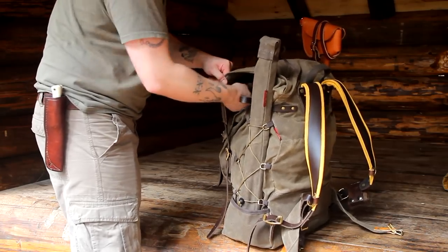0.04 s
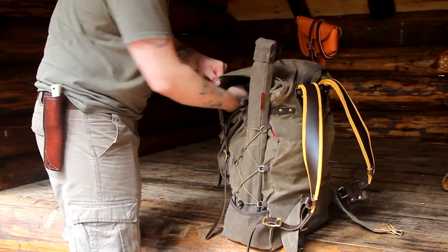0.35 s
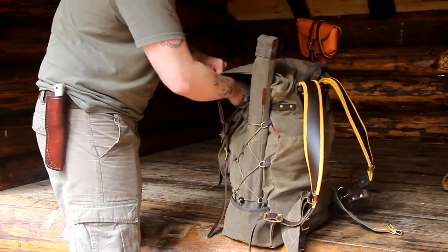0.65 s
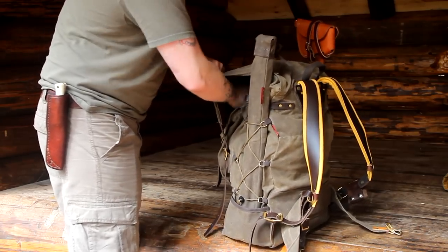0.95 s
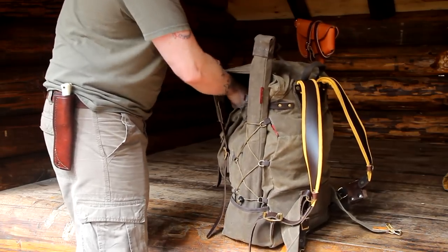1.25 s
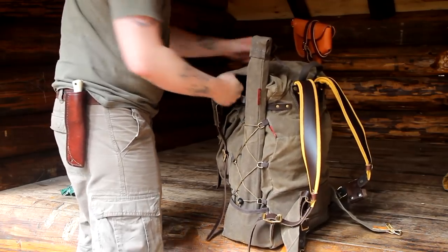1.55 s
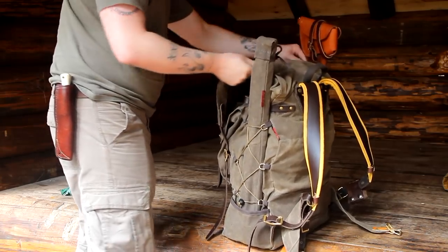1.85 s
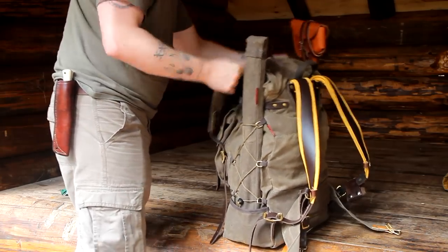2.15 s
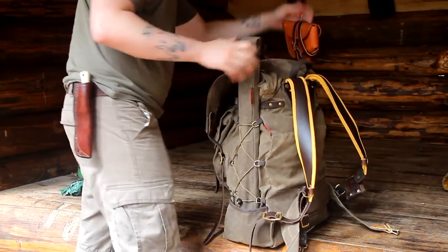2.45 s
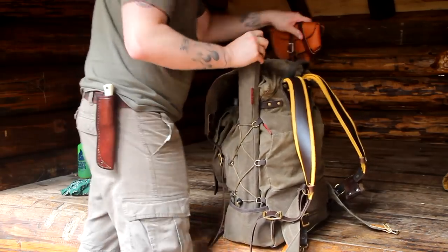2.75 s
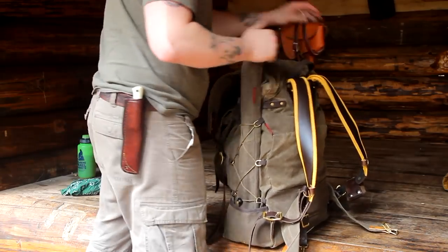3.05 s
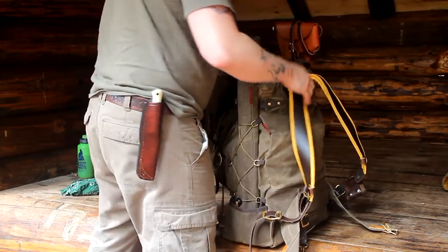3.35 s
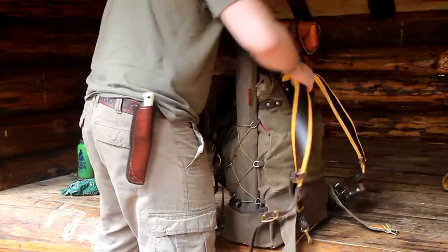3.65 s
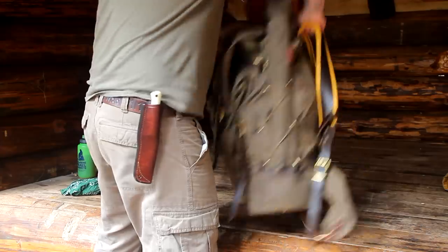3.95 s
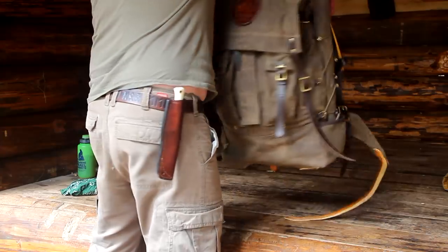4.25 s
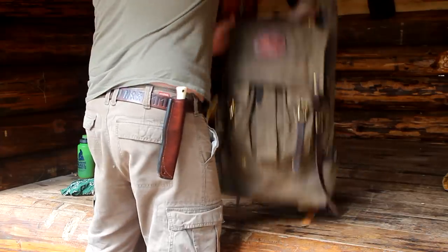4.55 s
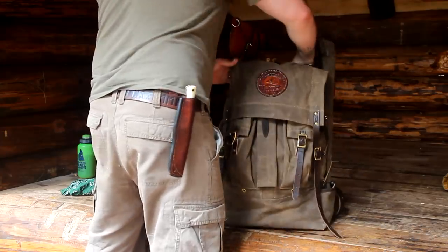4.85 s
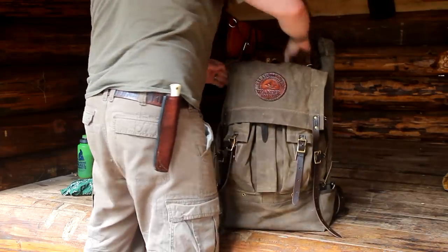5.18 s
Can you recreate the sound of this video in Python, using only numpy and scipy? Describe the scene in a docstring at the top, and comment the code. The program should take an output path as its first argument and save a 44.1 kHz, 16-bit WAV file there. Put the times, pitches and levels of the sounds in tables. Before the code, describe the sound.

In a quiet log shelter, a canvas backpack is fastened close to the microphone: cloth rubs, straps tug and a fastener snaps sharply. The pack is lifted with a scrape and thin clinks of buckles. Near the end it drops onto wooden boards with a double knock and a heavy thump that briefly overloads the microphone, then settles with a strap slap. A faint outdoor hush and low plank rumble lie underneath.

```python
"""A canvas pack drops on the plank floor of a log shelter: its frame strikes twice, then the load
thumps down, rings the boards and overloads the microphone. Before that it is strapped shut and lifted:
cloth rubs in tiny slips, leather straps tug and slap, a fastener snaps and metal buckles jingle.
Underneath are an outdoor hush and the rumble of flexing planks; the logs return short echoes."""
import sys
import numpy as np
from scipy import signal
from scipy.io import wavfile

SR = 44100
rng = np.random.default_rng(int(sys.argv[2]) if len(sys.argv) > 2 else 0)


def master(y):
    """Save y as 16-bit WAV."""
    cut = np.clip(np.atleast_2d(y).T, -1, 1)
    pcm = np.round(cut * 32767)  # scale
    wavfile.write(sys.argv[1], SR, pcm.astype(np.int16))


N = 230052
TIME_S = np.arange(N) / SR
AFTER_S = TIME_S[:SR]  # the second after a blow


def amp(db):
    """Decibels to gain."""
    return 10 ** (np.asarray(db) / 20)


def unit_rms(x):
    """Scales to rms 1."""
    return x / np.sqrt(np.mean(x ** 2) + 1e-20)


def unit_blow(x):
    """Scales to the energy of 1 ms at full level."""
    return x / np.sqrt(np.sum(x ** 2) * 1000 / SR + 1e-20)


def lookup(points, hz):
    """Interpolates a table over log frequency."""
    points_hz, values = np.transpose(points)
    return np.interp(np.log(hz + 1), np.log(points_hz + 1), values)


def add(mix, start_s, sound):
    """Mixes a sound in at start_s."""
    part = mix[max(round(start_s * SR), 0):][:len(sound)]
    part += sound[:len(part)]


def decay(t60_s):
    """Envelope falling 60 dB in t60_s."""
    return np.exp(-np.log(1000) * AFTER_S / t60_s)


def coloured(x, colour, size=4096):
    """Minimum-phase filter from rows of freq_hz, gain_db."""
    log_gain = np.log(amp(lookup(colour, abs(np.fft.fftfreq(size, 1 / SR)))))
    taps = np.fft.ifft(np.exp(np.conj(signal.hilbert(log_gain)))).real
    return signal.oaconvolve(x, taps)[:len(x)]


def band(x, low_hz, high_hz, order=2):
    """Butterworth band-pass."""
    sos = signal.butter(order, [low_hz, min(high_hz, SR / 2 - 100)], "band", fs=SR, output="sos")
    return signal.sosfilt(sos, x)


def ring(modes):
    """Free ringing of a struck object: damped sines."""
    return sum(amp(db) * decay(t60_s) * np.sin(2 * np.pi * hz * AFTER_S) for hz, db, t60_s in modes)


def contact(crunch_t60_s, crunch, touch_t60_s=0.0036):
    """A brief rough touch, then a crunch of small slips."""
    touch, slips = rng.standard_normal((2, SR))
    return unit_blow(touch * decay(touch_t60_s)) + crunch * unit_blow(slips * decay(crunch_t60_s))


def hard_blows(rows, colour, modes, crunch):
    """Hard contacts: a crack plus the ring of the struck object."""
    out = np.zeros(N)
    tone = unit_blow(ring(modes) * (1 - decay(0.0032)))
    for start_s, db, ring_db, crack_t60_s in rows:
        crack = unit_blow(coloured(contact(crack_t60_s, crunch), colour))
        add(out, start_s, amp(db) * (crack + amp(ring_db) * tone))
    return out


def soft_blows(rows):
    """Soft contacts: a few swings that swell and die."""
    out = np.zeros(N)
    for start_s, db, hz, half_rise_s in rows:
        age = AFTER_S / (2 * half_rise_s)
        swell = (age * np.exp(1 - age)) ** 3
        add(out, start_s, -amp(db) * swell * np.sin(2 * np.pi * hz * AFTER_S))
    return out


def friction(colour, slips_per_s, spread_db, hiss, flutter_db):
    """Fibres catch and slip: uneven clicks over hiss, clumped by the unsteady hand."""
    sizes = np.minimum(rng.exponential(1, N), 3)
    slips = (rng.random(N) < slips_per_s / SR) * rng.choice([-1, 1], N) * amp(spread_db * sizes)
    clumps = unit_rms(band(rng.standard_normal(N), 3.2, 74, order=1))
    rubbing = unit_rms(slips) + hiss * rng.standard_normal(N)
    return unit_rms(coloured(rubbing * amp(flutter_db * clumps), colour))


def stroke(middle_s, half_s, shape=1.3):
    """A hand speeds up and slows down; a shape below 2 is more pointed than a bell."""
    return np.exp(-np.minimum(abs((TIME_S - middle_s) / half_s) ** shape, 20))


def shelter(x, tail_db, echo_db, scatter_t60_s=0.025):
    """Round logs scatter each early echo; a diffuse tail follows, longest in the low mids."""
    # floor, roof and wall echoes: delay_s, relative_db
    echoes = [(.0031, -3.5), (0.011, -5.5), (0.0164, -9.5), (0.0194, -24.5), (0.0274, -16), (0.036, -28)]
    # tail decay: freq_hz, t60_s
    tail_t60 = [(60, 0.078), (200, 0.29), (600, 0.27), (2000, 0.19), (5000, 0.17), (14000, 0.15)]
    hz, time_s, spectrum = signal.stft(rng.standard_normal(SR), SR, nperseg=256)
    fade = np.exp(-np.log(1000) * time_s / lookup(tail_t60, hz)[:, None])
    tail = signal.istft(spectrum * fade, SR, nperseg=256)[1][:SR]
    tail *= np.clip((AFTER_S - 0.004) / 0.01, 0, 1)
    response = amp(tail_db) * tail / np.linalg.norm(tail)
    for delay_s, db in echoes:
        echo = rng.standard_normal(SR) * decay(scatter_t60_s)
        add(response, delay_s, amp(db + echo_db) * echo / np.linalg.norm(echo))
    return x + signal.oaconvolve(x, response)[:N]


def air(level_db=-51):
    """Steady outdoor hush."""
    # hush spectrum: freq_hz, gain_db
    colour = [(12, -38), (20, -3), (30, -33), (49, -11), (101, -6.5), (326, -2.5), (775, -4.5),
              (14500, -22.5), (15800, -26)]
    return amp(level_db) * unit_rms(coloured(rng.standard_normal(N), colour))


def plank_flex(idle_db=-68, rise_s=0.033):
    """The planks rumble faintly, swelling when weight comes down."""
    # weight of the feet, lastly of the pack: start_s, level_db, fall_tau_s
    loadings = [(0.37, -50, 0.5), (0.8, -48, 0.25), (2.18, -48, 0.24), (2.62, -36.5, 0.17),
                (4.68, -35, 0.6)]
    # rumble spectrum: freq_hz, gain_db
    colour = [(12, 25.5), (28, 2), (50, 3), (95, 11), (140, 5), (300, -99)]
    level = amp(idle_db)
    for start_s, db, fall_tau_s in loadings:
        since_s = np.maximum(TIME_S - start_s, 0)
        level += amp(db) * (1 - np.exp(-since_s / rise_s)) * np.exp(-since_s / fall_tau_s)
    return level * unit_rms(coloured(rng.standard_normal(N), colour))


def rustle(gain_db=-2, load_lag_s=0.017, drag_db=-5):
    """Heaves scrape the straps, then crumple the load; brushes swish the canvas and drag the straps."""
    # pack pushed, pulled or settling: middle_s, half_length_s, scrape_db, load_re_scrape_db
    heaves = [(0.007, 0.081, -47.5, 12.5), (0.42, 0.075, -47.5, 6), (0.765, 0.064, -50.5, 5.5),
              (1.001, 0.18, -57, 8.5), (1.424, 0.18, -50.5, -14), (1.94, 0.31, -49.5, -0.5),
              (2.2, 0.066, -42.5, 0), (2.658, 0.039, -35.5, -1), (2.877, 0.37, -48, 0.5),
              (3.58, 0.11, -43, 1.5), (3.883, 0.12, -39.5, 1.5), (4.213, 0.37, -54.5, -5),
              (4.763, 0.049, -40, 21.5), (4.874, 0.021, -30.5, -7), (5.046, 0.13, -60, 19)]
    # hand or sleeve on canvas: middle_s, half_length_s, level_db
    brushes = [(0.032, 0.11, -47.5), (0.397, 0.049, -43.5), (0.575, 0.048, -47.5), (0.774, 0.028, -40.5),
               (0.916, 0.063, -45.5), (1.393, 0.068, -45), (1.648, 0.046, -52), (1.898, 0.25, -60),
               (2.187, 0.038, -44), (2.336, 0.029, -48), (3.064, 0.041, -52), (3.528, 0.049, -48),
               (3.853, 0.3, -59), (4.173, 0.064, -51), (4.876, 0.029, -54), (5.21, 0.054, -53)]
    # load, strap and canvas spectra: freq_hz, gain_db
    load_colour = [(30, -20), (70, -18), (120, -1.5), (200, -2.5), (330, 1), (600, -6), (1000, -12.5),
                   (2000, -22.5), (5000, -55)]
    strap_colour = [(200, -7.5), (500, -3.5), (900, 3.5), (1600, 1), (2800, -2), (4500, -10), (9000, -26.5)]
    canvas_colour = [(500, 1), (2000, -6), (4000, 0.5), (6500, -3.5), (10000, -6), (15500, -7.5)]
    swish = sum(amp(db) * stroke(s, half_s) for s, half_s, db in brushes)
    crumple = sum(amp(db + load_db) * stroke(s + load_lag_s, half_s) for s, half_s, db, load_db in heaves)
    pull_power = sum((amp(db) * stroke(s, half_s)) ** 2 for s, half_s, db, _ in heaves)
    scrape = np.sqrt(pull_power + (amp(drag_db) * swish) ** 2)
    folds = friction(load_colour, slips_per_s=250, spread_db=3, hiss=0.7, flutter_db=3)
    leather = friction(strap_colour, slips_per_s=900, spread_db=3, hiss=1.2, flutter_db=1.3)
    weave = friction(canvas_colour, slips_per_s=3000, spread_db=2, hiss=1, flutter_db=1)
    return amp(gain_db) * (crumple * folds + scrape * leather + swish * weave)


def strap_slides():
    """A strap zips through the hand in fine, dense slips."""
    # slides: middle_s, level_db, centre_hz, half_length_s
    slides = [(2.192, -52, 3630, 0.025), (3.542, -39.5, 2480, 0.0095), (3.549, -37, 1130, 0.025),
              (3.957, -42, 1970, 0.0088)]
    slips = friction([(300, 0), (15000, 0)], slips_per_s=1500, spread_db=2, hiss=0.7, flutter_db=2)
    out = np.zeros(N)
    for middle_s, db, hz, half_s in slides:
        swell = np.exp(-((TIME_S - middle_s) / half_s) ** 2)
        out += amp(db) * swell * unit_rms(band(slips, hz / 1.18, hz * 1.28))
    return out


def tug(body_hz, tick_db, length_s, pack_db=-6, pack_hz=280, boards_db=-12):
    """A strap pulled taut knocks dully, ticks at its surface and shakes the pack and boards."""
    take_up_s = 0.0011 * (length_s / 0.022) ** 1.5  # slack leather takes the load gradually
    push = contact(length_s * 2, crunch=1.1) * (1 - np.exp(-(AFTER_S + 0.00034) / take_up_s))
    strap = unit_blow(band(push, body_hz / 1.75, body_hz * 1.695, order=3))
    shake = contact(length_s * 3, crunch=1.5)
    pack = unit_blow(band(shake, pack_hz / 1.92, pack_hz * 1.65))
    boards = amp(boards_db) * unit_blow(band(shake, 66, 134))
    coupling = min(1, (400 / body_hz) ** 2)  # light, high slaps hardly move the pack
    tick_colour = [(400, -53), (1000, 15.5), (2200, 13.5), (3200, 9), (4000, 9.5), (5000, 3), (15000, -7)]
    tick = unit_blow(coloured(push, tick_colour))
    return strap + amp(tick_db) * tick + amp(pack_db) * coupling * (pack + boards)


def strap_tugs(rebound_s=0.015, rebound_db=-5):
    """After each tug the strap gives and catches again: weaker, duller, longer."""
    # leather tugs and slaps: start_s, level_db, body_hz, tick_re_body_db, nominal_length_s
    pulls = [(0.006, -20.5, 332, -30, 0.034), (0.056, -25.5, 320, -32, 0.023), (0.399, -25, 400, -15, 0.03),
             (0.451, -21, 374, -13.5, 0.013), (0.464, -28, 420, -30, .028), (0.5785, -19, 460, -27, 0.019),
             (0.696, -27, 380, -11, 0.026), (0.71, -23.5, 400, -7.5, 0.016),
             (0.834, -21.5, 321, -14, 0.027), (0.958, -22.5, 367, -11.5, 0.025),
             (0.999, -14.5, 387, -11.5, 0.02), (1.214, -31.5, 953, -1, 0.054), (1.857, -25, 920, -6, 0.041),
             (2.11, -29, 404, -6, .017), (2.968, -29.5, 590, -16, 0.0086), (3.453, -33, 810, -11, 0.015),
             (3.466, -25, 337, -6.5, 0.029), (3.607, -32.5, 690, 0, 0.01), (3.765, -24.5, 283, -14, .07),
             (3.956, -20.5, 485, -16, 0.041), (4.276, -30.5, 610, -0.5, .024),
             (4.988, -13, 570, -17.5, 0.032), (5.1, -28, 513, -35, .019)]
    out = np.zeros(N)
    for start_s, db, body_hz, tick_db, length_s in pulls:
        add(out, start_s, amp(db) * tug(body_hz, tick_db, length_s))
        add(out, start_s + rebound_s, amp(db + rebound_db) * tug(body_hz, tick_db - 9, length_s * 1.4))
    return out


def fitting_ticks():
    """The fittings click without ringing."""
    # clicks: start_s, level_db, pitch_hz
    ticks = [(0.535, -37.5, 2500), (0.998, -32, 4100), (1.224, -40, 9000), (1.879, -40, 5000),
             (2.664, -31.5, 6000), (3.325, -40, 9500), (3.611, -36.5, 7000), (3.907, -29, 5800),
             (4.35, -38.5, 9000)]
    out = np.zeros(N)
    for start_s, db, hz in ticks:
        click = band(contact(0.036, crunch=2.2), hz / 2.6, hz * 1.13, order=1)
        add(out, start_s, amp(db) * unit_blow(click))
    return out


def buckles(spread_db=3, chatter=0.65, tick_db=-9.5, bounce_s=0.0047, bounce_db=-5.5, free_t60_s=0.26):
    """Buckles tick, ring one main mode and others by chance, and bounce once; loose metal chatters."""
    # touches: start_s, level_db, main_hz, main_t60_s, others_re_main_db
    clinks = [(3.712, -32.5, 7600, .1, 4), (3.819, -36, 15391, .35, 0), (3.844, -32, 14648, 0.13, 4),
              (3.869, -27, 14648, 0.16, -9), (3.879, -33, 7337, 0.3, -3), (3.925, -30.5, 5512, 0.3, 7),
              (4.069, -39.5, 11200, 0.14, 1), (4.154, -32.5, 11430, .12, -8), (4.616, -16, 15391, .11, 12),
              (4.692, -29, 12170, 0.4, -2), (4.86, -32, 14648, 0.12, 10), (4.996, -40.5, 9550, 0.075, -10),
              (4.999, -43, 8050, 0.23, -5)]
    # free-hanging buckle: pitch_hz, relative_db, t60_s
    modes = [(3300, -16, .15), (5512, -10, .2), (7337, -5, .25), (7620, -8, .18), (8050, -15, .25),
             (9550, -12, .16), (10847, -9, .25), (11100, -6, .22), (11625, -8, .18), (12180, -5, .25),
             (13800, -9, .18), (14648, -3, .18), (15391, 0, .25), (15730, -6, .2)]
    modes_hz, modes_db, modes_t60_s = np.transpose(modes)
    out = np.zeros(N)
    for start_s, db, main_hz, main_t60_s, others_db in clinks:
        nearest_hz = modes_hz[np.argmin(abs(modes_hz - main_hz))]
        main = unit_blow(ring([(nearest_hz, 0, main_t60_s)]) * (1 - decay(0.008)))
        t60s_s = modes_t60_s * main_t60_s / free_t60_s  # every mode's decay scales with the main mode's: shorter when damped against canvas, longer when free
        for delay_s, touch_db, main_gain in [(0, 0, 1), (bounce_s, bounce_db, 0)]:
            levels_db = modes_db + spread_db * rng.standard_normal(len(modes))
            others = unit_blow(ring(zip(modes_hz, levels_db, t60s_s)))
            tone = main_gain * main + amp(others_db) * others
            waver_rad, flicker = chatter * unit_rms(band(rng.standard_normal((2, SR)), 12.4, 60, order=1))
            phase_turn = np.exp(1j * (waver_rad + 2 * np.pi * rng.random()))
            metal = unit_blow((signal.hilbert(tone) * phase_turn).real * (1 + flicker))
            tick = unit_blow(band(contact(0.066, crunch=4.3), 4300, 17000))
            add(out, start_s + delay_s, amp(db + touch_db) * (metal + amp(tick_db) * tick))
    return out


def fastener():
    """The fastener snaps with a crack and a brief ring."""
    # snaps: start_s, level_db, ring_re_crack_db, crack_t60_s
    snaps = [(2.606, -15, -12, 0.029), (2.662, -24, -25, 0.046), (2.7155, -13.5, 5.5, 0.019)]
    # crack spectrum: freq_hz, gain_db
    colour = [(60, -43), (150, -18), (400, 7), (650, -7), (900, -3), (1500, -1), (2200, 2), (3400, -13.5),
              (4500, -19.5), (7000, -29), (14000, -45)]
    # fastener modes: pitch_hz, relative_db, t60_s
    modes = [(510, -26, 0.061), (920, -13, 0.047), (2060, -10, 0.033), (2067, -8, 0.039),
             (2195, 12.5, 0.0061), (2340, -4, 0.011), (2770, -24, 0.034), (3390, -5, 0.015)]
    return hard_blows(snaps, colour, modes, crunch=0.77)


def frame():
    """The light wooden frame swings, strikes the boards and rocks, radiating little bass."""
    # contacts in two clusters: start_s, level_db, ring_re_crack_db, crack_t60_s
    strikes = [(4.6175, -3, -0.5, 0.024), (4.6205, -6.5, -1.5, 0.026), (4.6905, -6, -18, 0.026),
               (4.6945, 2, -11, 0.095), (4.6995, -6, -6, 0.033), (4.7075, -4, -25, 0.025)]
    # crack spectrum: freq_hz, gain_db
    colour = [(30, -44), (70, -25), (160, 0), (350, 9.5), (650, -5), (1200, -1), (2000, -15), (3400, -18.5),
              (5200, -26), (7500, -28.5), (10000, -34), (15500, -32)]
    # frame modes: pitch_hz, relative_db, t60_s
    modes = [(332, -3, 0.049), (397.6, 3.5, 0.19), (453, 2, 0.43), (858, 13, 0.073), (890, 8, 0.091),
             (1100, -5, 0.14), (1150, -10, 0.1), (1270, -16, 0.15), (1510, -23, .07), (1730, -3, 0.051),
             (2536, -7, 0.1)]
    # hollow taps: start_s, level_db, pitch_hz, half_rise_s
    taps = [(4.272, -28.5, 623, 0.0027), (4.6205, -14.5, 1183, 0.004), (4.632, -13.5, 852, 0.0018)]
    return band(hard_blows(strikes, colour, modes, crunch=0.68) + soft_blows(taps), 117, 20500)


def load_thump(landing_s=4.7072, planks_db=-9, contents_db=-4):
    """The load drives the boards through a few deep swings; they ring on while the contents shift."""
    # boards giving under frame, then load: start_s, level_db, pitch_hz, half_rise_s
    thumps = [(4.6168, -8, 327, 0.0017), (4.627, -26, 96, 0.011), (4.7072, 7, 264.3, 0.0022),
              (4.712, -17, 158, 0.0084), (4.7238, -7, 220, 0.0022)]
    # plank modes: pitch_hz, relative_db, t60_s
    modes = [(96, -9.5, 0.42), (145.3, -8, 0.41), (178, 7, 0.27), (205, 3.5, 0.35), (247, -12, 0.31),
             (364, -26, 0.18), (445, -10, 0.35), (556, -4.5, 0.17), (651, -16, 0.1)]
    out = soft_blows(thumps)
    add(out, landing_s, amp(planks_db) * ring(modes) * (1 - decay(0.14)))
    contents = unit_blow(band(rng.standard_normal(SR) * decay(0.39), 170, 1050))
    add(out, landing_s, amp(contents_db) * contents)
    return out


def scene():
    """Handling and landing echo in the shelter, over rumble and hush; mono."""
    handling = rustle() + strap_slides() + strap_tugs() + fitting_ticks() + buckles() + fastener()
    knocks = frame()
    pack = shelter(handling, tail_db=-8, echo_db=-4.5)
    pack += shelter(knocks, tail_db=-9.5, echo_db=-6)
    pack += shelter(load_thump(), tail_db=-15, echo_db=-14.5)
    return (pack + plank_flex() + air())[None]


def record(dry, threshold_db=-17, duck_db_per_db=0.48, recovery_db_per_s=22, lag_s=0.06, edge_hz=15850):
    """Gain control ducks too late to stop the landing from clipping; a low-pass follows."""
    power_db = 10 * np.log10(signal.lfilter([1 / 1000], [1, 1 / 1000 - 1], dry[0] ** 2) + 1e-12)
    recovery_db = TIME_S * recovery_db_per_s
    held_db = np.maximum.accumulate(power_db + recovery_db) - recovery_db
    over_db = np.maximum(held_db - threshold_db, 0)
    pole = np.exp(-1 / (lag_s * SR))
    duck_db = duck_db_per_db * signal.lfilter([1 - pole], [1, -pole], over_db)
    clipped = np.clip(dry * amp(-duck_db), -1, 1)
    low_pass = signal.firwin(511, edge_hz, window=("kaiser", 9), fs=SR)
    return signal.oaconvolve(clipped, low_pass[None], "same")


dry = scene()
out = record(dry)
master(out)
```